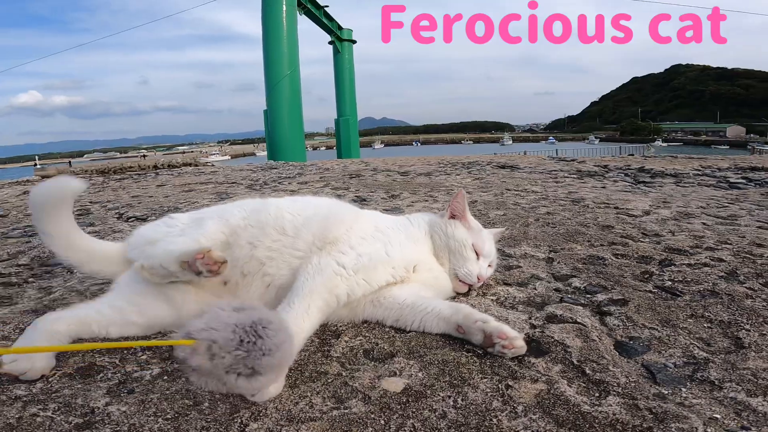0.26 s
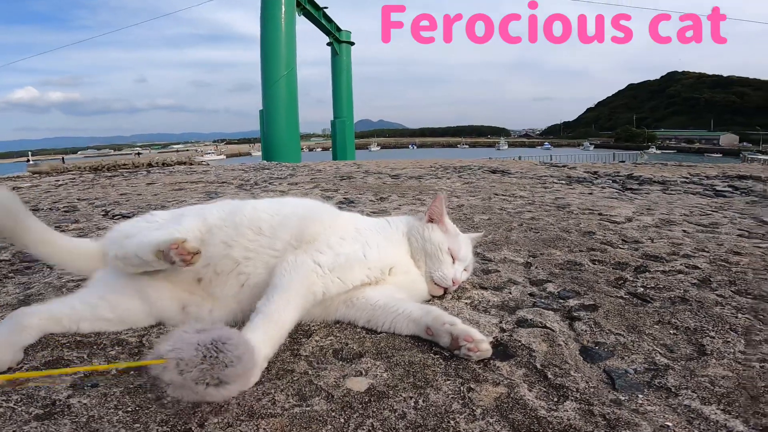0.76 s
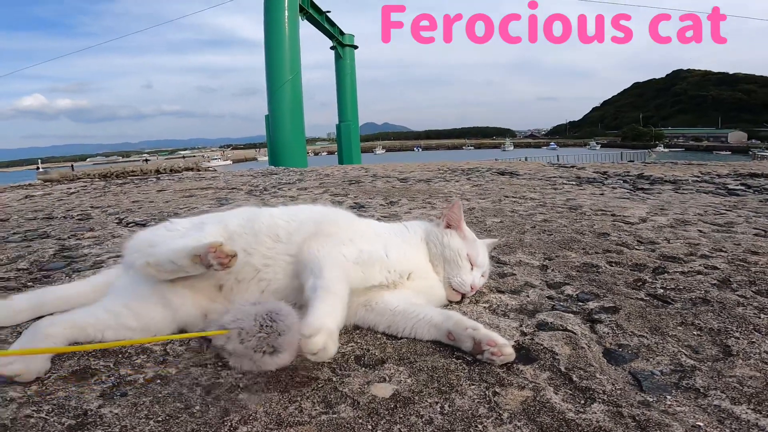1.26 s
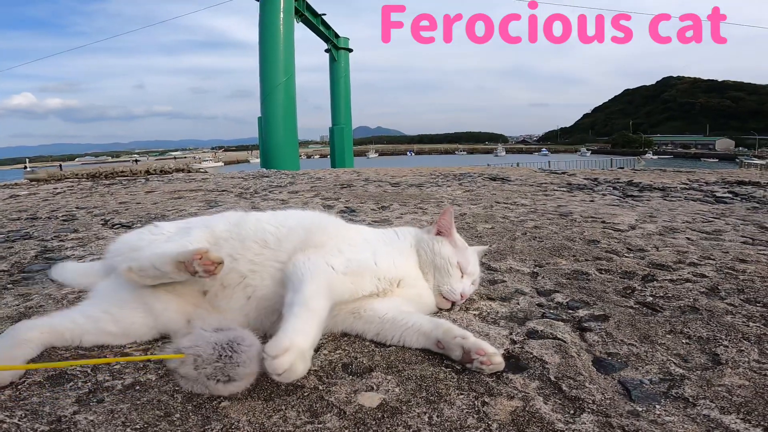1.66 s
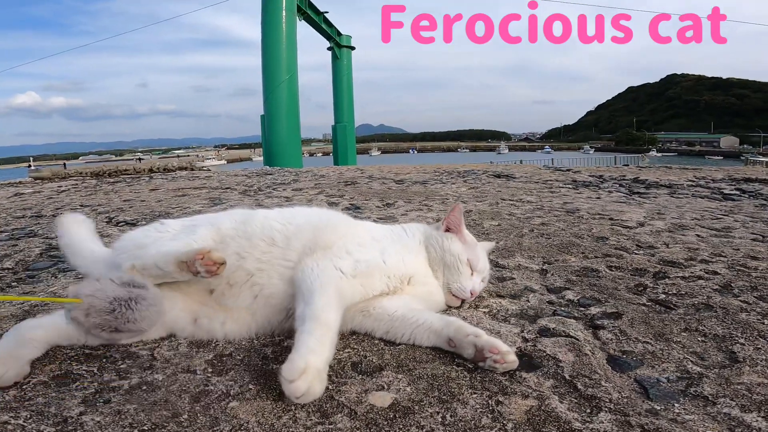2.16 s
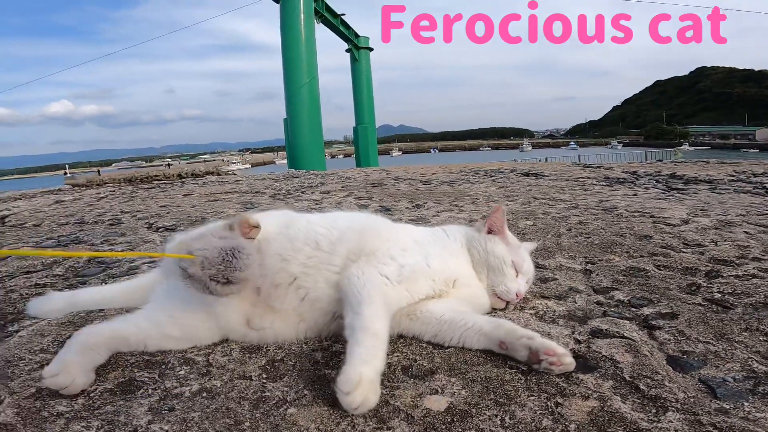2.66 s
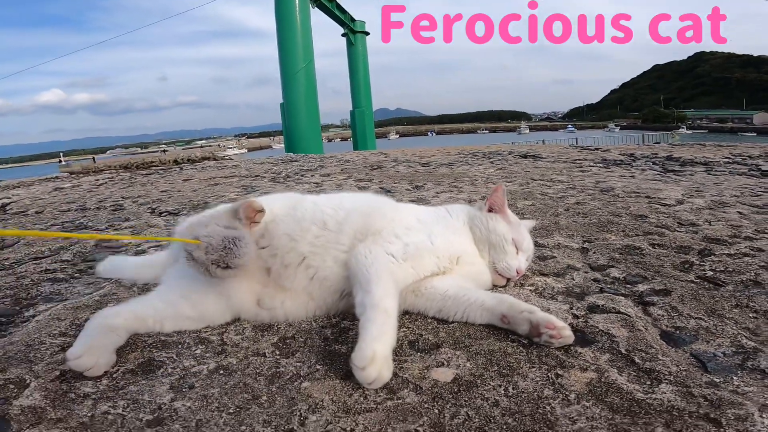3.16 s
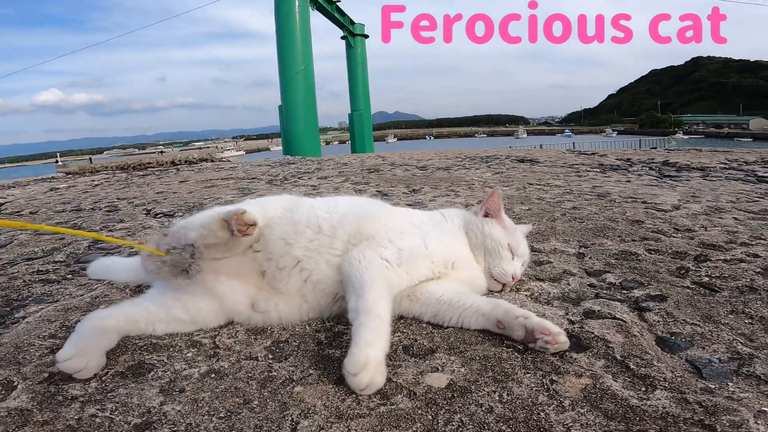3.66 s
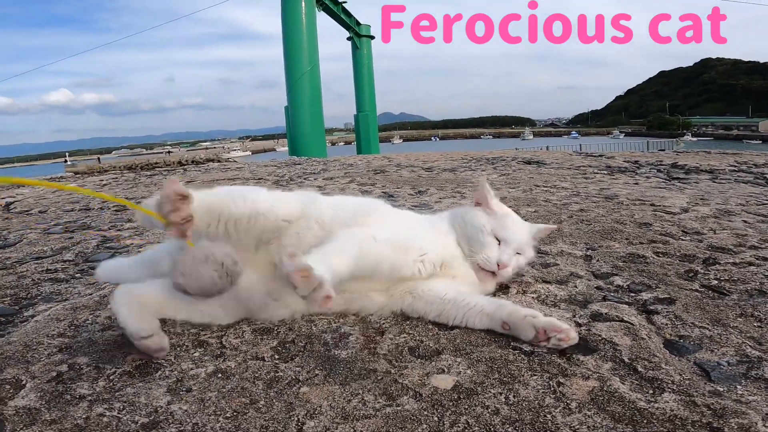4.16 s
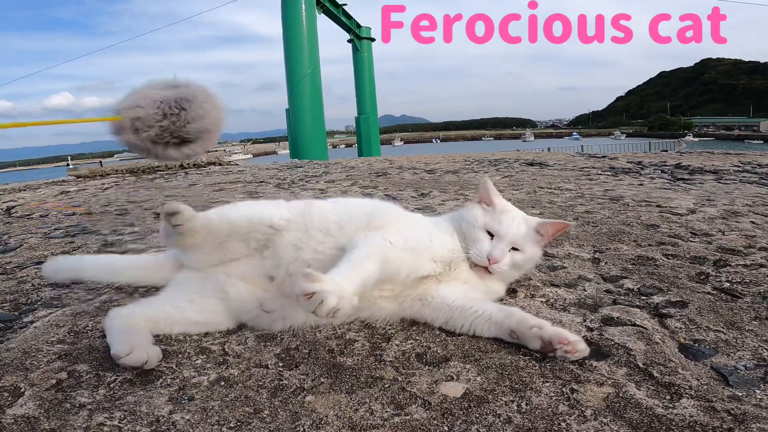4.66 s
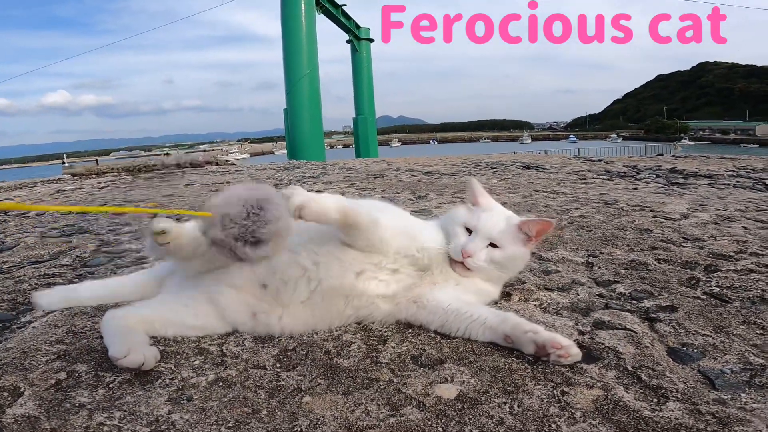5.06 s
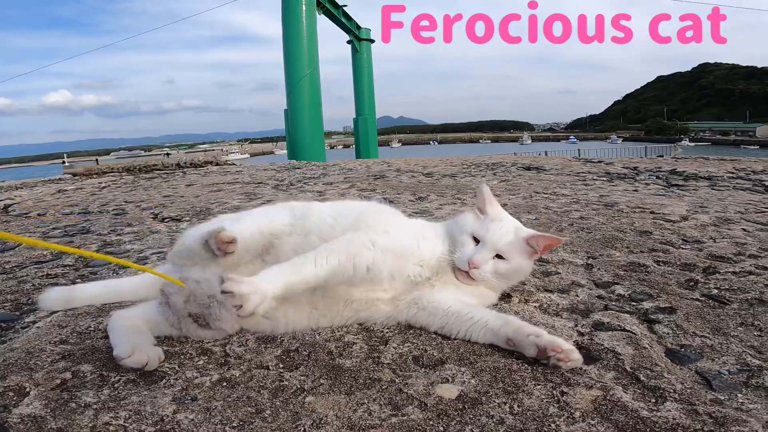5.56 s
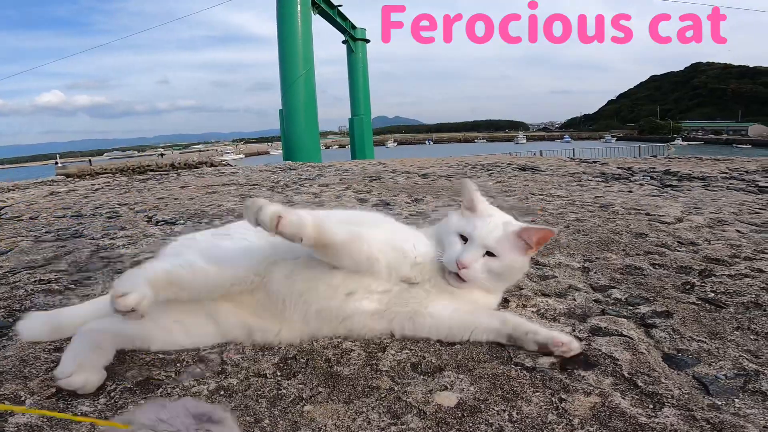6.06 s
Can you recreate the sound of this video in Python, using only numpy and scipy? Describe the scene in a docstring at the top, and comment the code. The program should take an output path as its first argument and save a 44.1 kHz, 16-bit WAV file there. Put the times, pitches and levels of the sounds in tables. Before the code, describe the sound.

An annoyed cat growls low with its mouth shut, moans thinly, then bursts into rough yowls and a sharp yelp in rumbling seaside wind.

```python
"""Stone quay: a cat teased with a fur toy on a stick growls with its mouth shut, slips into a thin moan,
then opens its mouth for rough yowls and a yelp. Growl: uneven pulses through chest and mouth resonances.
Moan: three harmonics. Yowls: pulses ringing mouth, lips and teeth, plus a sine fundamental.
The toy's brushing and the yelp's breathy hiss are shaped noise, with ticks, knocks and squeaks of the stick;
a far boat engine is a wavering sine; wind on the microphone and sea are banded noise."""
import sys
import numpy as np
from scipy import signal
from scipy.fft import rfft, irfft
from scipy.io import wavfile
from scipy.ndimage import uniform_filter1d

SR = 44100
rng = np.random.default_rng(int(sys.argv[2]) if len(sys.argv) > 2 else 0)


def transcribe(u):
    """Save the signal u as a 16-bit wav file named by the first command-line argument.

    u: samples, shape (n,) or (channels, n), limited to [-1, 1]; the rate is SR.
    q: integer samples, one column per channel.
    """
    v = np.clip(np.atleast_2d(u).T, -1, 1)
    q = np.round(v * 32767).astype(np.int16)
    wavfile.write(sys.argv[1], SR, q)


N = 279056
T = np.arange(N) / SR

# Effort of the long growl. Each row: time in seconds, chest level in dB before CHEST_TRIM_DB, mouth level in dB.
GROWL_EFFORT = [(.62, -51, -77), (.7, -43, -63), (.84, -41, -57), (.9, -42, -60), (1.1, -39.5, -59),
                (1.2, -44, -65.5), (1.42, -41, -59.5), (1.75, -44, -61), (2.33, -46.5, -67.5),
                (2.41, -39.5, -60), (2.5, -38, -55), (2.6, -43.5, -60.5), (2.9, -44, -64.5),
                (3.3, -45.5, -59.5), (3.62, -45, -61.5), (3.72, -42.5, -53), (3.93, -42.5, -52.5),
                (3.96, -44, -53.5)]
# Short creaks where a yowl starts or breaks off. Each row: start in seconds, length in seconds,
# chest level in dB before CHEST_TRIM_DB, mouth level in dB, mean flaps per second.
CREAKS = [(4.191, .055, -45, -51, 140), (5.153, 0.09, -44, -54.5, 200), (5.686, 0.055, -50, -45.5, 170)]
# Growl resonances. Each row: frequency in Hz, width in Hz, gain in dB before levelling.
CHEST_MODES = [(125, 88, 6.5), (304.3, 80, -2)]
MOUTH_MODES = [(963, 340, 23.5), (1270, 220, 5.1)]
# Faint nose hiss swelling within the growl: peak time in seconds, rise in seconds, fall in seconds.
NOSE_HISS = (1.6, .9, .6)
# Folds start slack, tighten to their usual pace and flap faster when pushed.
USUAL_FLAPS_PER_S, SLACK_SHARE, TIGHTEN_S = 126, .38, .25
USUAL_CHEST_DB, PACE_OCTAVES_PER_DB = -42.5, .09
UNEVENNESS, FLAP_SPREAD_DB, WEAK_FLAP_DB = .2, 3.5, -.5
CHEST_TRIM_DB, NOSE_RE_CHEST_DB, NOSE_MODE = 1, -42, (4450, 600, 0)
PUFF_DECAY_S, PUFF_SHARE, CREAK_FADE_S = .0064, .94, .0083
MOUTH_DROP_S, MOUTH_DROP_TAKES_S, MOUTH_DROP_RATIO, MOUTH_DROP_TOP_HZ = 3.58, .13, .83, 1145


def growl():
    """Slack vocal folds flap unevenly; each flap thumps the chest and puffs air into mouth and nose."""
    chest_db, mouth_db = in_time(GROWL_EFFORT)
    slack = SLACK_SHARE * swell(GROWL_EFFORT[0][0], TIGHTEN_S, TIGHTEN_S)
    push_octaves = PACE_OCTAVES_PER_DB * (chest_db - USUAL_CHEST_DB)
    pace = USUAL_FLAPS_PER_S * (1 - slack) * 2 ** push_octaves
    chest_gain, mouth_gain = during(GROWL_EFFORT) * from_db([chest_db, mouth_db])
    for s, length_s, creak_chest_db, creak_mouth_db, flaps_per_s in CREAKS:
        creak = during([[s], [s + length_s]], fade_s=CREAK_FADE_S)
        pace = np.where(creak > 0, flaps_per_s, pace)
        chest_gain = chest_gain + creak * from_db(creak_chest_db)
        mouth_gain = mouth_gain + creak * from_db(creak_mouth_db)

    flap_number = np.floor(np.cumsum(pace * np.exp(UNEVENNESS * drift(75))) / SR)
    flaps = np.diff(flap_number, prepend=0) * from_db(FLAP_SPREAD_DB * drift(130))
    air_flaps = flaps * from_db(WEAK_FLAP_DB * (flap_number % 2))  # every second flap passes less air

    chest = cut(resonate(flaps, CHEST_MODES), 435, "low", order=6)
    chest = evened(cut(chest, 92, "high"), size=1500)

    puff_envelope = signal.lfilter([1], [1, -np.exp(-1 / (PUFF_DECAY_S * SR))], air_flaps + 1e-18)
    puffs = puff_envelope * rng.standard_normal(N)
    flow = rms_one(air_flaps) + PUFF_SHARE * rms_one(puffs)

    # mouth rings lower just before the first cry
    dropped = np.clip((T - MOUTH_DROP_S) / MOUTH_DROP_TAKES_S, 0, 1)
    lower_modes = [(hz * MOUTH_DROP_RATIO, width, db) for hz, width, db in MOUTH_MODES]
    lower_mouth = cut(resonate(flow, lower_modes), MOUTH_DROP_TOP_HZ, "low", order=8)
    mouth = (1 - dropped) * resonate(flow, MOUTH_MODES) + dropped * lower_mouth
    mouth = cut(mouth, 1480, "low", order=8)
    mouth = evened(cut(mouth, 480, "high"), size=1300)

    nose = rms_one(resonate(resonate(puffs, [NOSE_MODE]), [NOSE_MODE]))
    nose_gain = from_db(NOSE_RE_CHEST_DB) * swell(*NOSE_HISS)
    return chest_gain * (from_db(CHEST_TRIM_DB) * chest + nose_gain * nose) + mouth_gain * mouth


# Closed-mouth moan. Each row: time in seconds, mean pitch in Hz, mean level in dB.
MOAN_CURVE = [(3.0, 379.7, -53), (3.038, 378.6, -38), (3.106, 372, -43.5), (3.214, 380.5, -33),
              (3.388, 381.5, -32.5), (3.43, 387.3, -30), (3.502, 396, -34.5), (3.524, 394, -41.5),
              (3.534, 391.6, -52), (3.544, 396, -42), (3.568, 394.9, -42), (3.578, 394.8, -47.5)]


def moan(second_db=-35, third_db=-36, pitch_spread=.005, level_spread_db=1):
    """With the mouth shut the folds lock into an almost pure tone, shaken a little."""
    pitch_hz, level_db = in_time(MOAN_CURVE)
    phase = 2 * np.pi * np.cumsum(pitch_hz * (1 + pitch_spread * drift(70))) / SR
    tone = np.cos(phase) + from_db(second_db) * np.cos(2 * phase) + from_db(third_db) * np.cos(3 * phase)
    return np.sqrt(2) * during(MOAN_CURVE) * from_db(level_db + level_spread_db * drift(60)) * tone


# Four open-mouthed cries, a curve each. Each row: time in seconds, pitch in Hz and level in dB before the throb,
# mouth resonance set by the jaw in Hz, lip snarl in dB relative to the level.
YOWL_CURVES = [
    [(3.945, 342.3, -54, 555, -37), (3.985, 337.6, -49.5, 580, -35), (4.025, 335.6, -54, 640, -24),
     (4.072, 318.4, -45.5, 890, -9), (4.078, 300.8, -39, 890, -18.5), (4.118, 281.6, -32.5, 950, -18),
     (4.14, 316, -26.5, 1030, -17), (4.158, 313, -26.5, 1060, -19), (4.172, 357.3, -26, 1080, -16),
     (4.192, 314.4, -30, 1130, -17), (4.2, 168.3, -32.5, 1170, -17), (4.218, 110, -37, 1160, -26),
     (4.243, 62, -52, 1030, -20)],
    [(5.157, 240.2, -50, 1140, -30), (5.19, 189.6, -48, 1100, -40), (5.228, 100, -62, 950, -26),
     (5.258, 264.8, -34, 850, -35), (5.28, 276.7, -38.5, 850, -38), (5.315, 282.3, -39.5, 870, -38),
     (5.39, 278.3, -34.5, 810, -46), (5.45, 296.8, -32, 840, -51), (5.478, 320.3, -31.5, 910, -42),
     (5.492, 308.3, -31.5, 910, -45), (5.512, 318.7, -29.5, 930, -40), (5.615, 325.4, -32.5, 954, -42.5),
     (5.662, 334.2, -28.5, 1020, -54), (5.672, 311.5, -27, 1020, -52), (5.686, 305, -28.5, 1030, -50),
     (5.704, 312, -38, 1080, -43), (5.722, 340, -38, 1120, -33)],
    [(5.72, 354, -39.5, 1090, -29), (5.745, 434.3, -46.5, 1110, -15), (5.765, 367.5, -38, 1050, -38),
     (5.786, 323, -20, 1230, -30.5), (5.803, 311, -19.5, 1300, -38), (5.822, 300.6, -30, 1250, -30.5),
     (5.843, 198, -39, 1190, -16)],
    [(5.905, 350, -46, 1200, -21), (5.922, 311.4, -32.5, 1290, -24), (5.95, 247.5, -32, 1270, -23),
     (5.966, 253.4, -34, 1210, -20), (5.978, 301.4, -37, 1190, -20), (6.0, 306, -32.5, 1180, -21),
     (6.01, 258.8, -34.5, 1110, -28), (6.052, 274.8, -33.5, 1010, -38), (6.073, 282, -29.5, 1100, -42),
     (6.091, 265.7, -35, 940, -42), (6.108, 256.7, -37, 900, -38), (6.128, 258, -38.5, 900, -30),
     (6.139, 282, -39, 880, -13), (6.165, 264, -33.5, 860, -15), (6.21, 269.5, -40.5, 880, -26),
     (6.235, 293, -46.5, 880, -27), (6.258, 271, -45.5, 860, -34), (6.29, 327, -60, 860, -22),
     (6.308, 348, -83, 859, -14)],
]
# One row per cry: fundamental in dB at the usual level and pitch, throat resonance ratio,
# lip resonance as a multiple of the mouth's, teeth resonance at the start in Hz, at the end in Hz,
# teeth level in dB relative to the fundamental at the usual level, time the teeth take to show in seconds.
MOUTH_SHAPES = [(-41, 1.01, 1.9, 5900, 5050, -27, 0.13), (-38.5, 0.999, 2.05, 6130, 6300, -25, .02),
                (-36.5, 0.995, 1.95, 6800, 4450, -22.5, .01), (-38, 0.987, 1.98, 4930, 4600, -23.5, .01)]
# Throat and open mouth. Each row: frequency in Hz before the throat ratio, gain in dB.
THROAT_COLOUR = [(300, -0.5), (480, 6), (620, -1.5), (720, 0.5), (850, 9), (1000, 3.5), (1280, 4),
                 (1580, -2.5), (1850, -8), (2100, -25), (2400, -48.5), (5000, -73.5)]
# Drawn-back lips. Each row: frequency in Hz for a lip resonance at SNARL_REF_HZ, gain in dB.
SNARL_COLOUR = [(900, -50), (1400, -25), (1750, -1.5), (2000, 8.5), (2350, -5.5), (2620, -16),
                (2950, -35.5), (5000, -75.5)]
SNARL_REF_HZ, JAW_WIDTH_HZ, TEETH_WIDTH_HZ = 2054, 330, 480
# Teeth resonances: ratio to the gap frequency, gain in dB.
TEETH_MODES = ((1, 0), (1.83, -12))
# The fundamental grows more slowly than the cry and carries better at high pitch.
FUNDAMENTAL_FOLLOWS, FUNDAMENTAL_DB_PER_OCTAVE = .17, 14
USUAL_YOWL_DB, USUAL_YOWL_HZ, CRY_FADE_S = -29, 303, .0081
# Teeth hiss grows with the cry and differs from puff to puff.
TEETH_FOLLOWS, TEETH_SPUTTER_DB = .12, 4
# Flutter bunches the snaps and weakens them where they lie furthest apart; a little chance comes on top.
FLUTTER_HZ, FLUTTER_WANDER, FLUTTER_SHIFT_S, FLUTTER_DB = 64, .3, .00023, 1.8
JITTER_SHARE, SHIMMER_DB, THROB_OCTAVES_PER_DB = .028, .9, .033
MOUTH_AIR, LIP_AIR, TEETH_AIR = .35, 1, 4.3
RING_HZ = np.fft.rfftfreq(1024, 1 / SR) + 1


def yowl(curve, fundamental_db, throat_ratio, lip_ratio, teeth_start_hz, teeth_end_hz, teeth_db, teeth_rise_s):
    """The folds snap shut once a cycle and ring mouth, lips and teeth; rough passages flutter."""
    pitch_hz, level_db, jaw_hz, snarl_db = in_time(curve)
    throb_db = throb()
    pitch_hz = pitch_hz * 2 ** (-THROB_OCTAVES_PER_DB * throb_db)  # swelling also lowers the pitch
    level_db = level_db + throb_db
    base_db = fundamental_db + FUNDAMENTAL_FOLLOWS * (level_db - USUAL_YOWL_DB)
    base_db = base_db + FUNDAMENTAL_DB_PER_OCTAVE * np.log2(pitch_hz / USUAL_YOWL_HZ)
    sounding = during(curve, fade_s=CRY_FADE_S)

    # one snap per cycle; read every curve at the snaps
    on = sounding > 0
    cycles = np.cumsum(pitch_hz[on]) / SR
    s = np.interp(np.arange(int(cycles[-1]) + 1), cycles, T[on])
    curves = (pitch_hz, level_db, jaw_hz, snarl_db, base_db, roughness(), sounding)
    hz, db, jaw, snarl, base, rasp, gate = [np.interp(s, T, c) for c in curves]
    timing, force, wander, spit = np.clip(rng.standard_normal((4, 300))[:, :len(s)], -1.8, 1.8)
    flutter = 2 * np.pi * np.cumsum(FLUTTER_HZ / hz * (1 + FLUTTER_WANDER * wander))
    shift_s = rasp * (FLUTTER_SHIFT_S * np.sin(flutter) + JITTER_SHARE * timing / hz)
    s = np.sort(s + shift_s)
    snap_db = rasp * (SHIMMER_DB * force - FLUTTER_DB * np.cos(flutter))
    strength = gate * np.sqrt(SR / hz) * from_db(snap_db)

    # a wider jaw carries mouth and lip resonances upwards
    jaw = jaw[:, None]
    throat = from_db(at_hz(THROAT_COLOUR, RING_HZ / throat_ratio))
    mouth = throat / np.hypot(1, (RING_HZ - jaw) / JAW_WIDTH_HZ)
    lips = from_db(at_hz(SNARL_COLOUR, RING_HZ * SNARL_REF_HZ / (lip_ratio * jaw)))
    # the narrow ring of the gap between the teeth slides through the cry
    gap_hz = np.interp(s, [s[0], s[-1]], [teeth_start_hz, teeth_end_hz])[:, None]
    teeth = sum(from_db(mode_db) / (1 + ((RING_HZ / ratio - gap_hz) / TEETH_WIDTH_HZ) ** 2) ** 2
                for ratio, mode_db in TEETH_MODES)
    hiss_db = base + teeth_db + TEETH_FOLLOWS * (db - USUAL_YOWL_DB)
    hiss_db = hiss_db + TEETH_SPUTTER_DB * np.sqrt(rasp) * spit
    teeth_shown = np.clip((s - curve[0][0]) / teeth_rise_s, 0, 1)

    phase = 2 * np.pi * np.interp(T, s, np.arange(len(s)))
    fundamental = np.sqrt(2) * sounding * from_db(base_db) * np.sin(phase)
    mouth_ring = rung(s, strength * from_db(db), mouth, MOUTH_AIR * rasp)
    lip_ring = rung(s, strength * from_db(db + snarl), lips, LIP_AIR * np.sqrt(rasp))
    teeth_ring = rung(s, strength * from_db(hiss_db) * teeth_shown, teeth, TEETH_AIR * np.sqrt(rasp))
    return fundamental + mouth_ring + lip_ring + teeth_ring


# Throb as the long yowl gathers force. Each row: time in seconds, depth in dB.
THROB_DEPTH = [(5.24, 0), (5.27, 4), (5.305, 5.5), (5.35, 2.7), (5.46, 2.7), (5.48, 2.2), (5.495, 0)]


def throb(rate_hz=17.7, crest_s=5.282):
    """Swell and sink of the voice in dB."""
    depth_db, = in_time(THROB_DEPTH)
    return depth_db * np.cos(2 * np.pi * rate_hz * (T - crest_s))


# Cries are rough except where the folds lock into a note.
# Each row: start in seconds, end in seconds, roughness left from 0 to 1.
CLEAR_NOTES = [(3.93, 4.06, .35), (4.095, 4.16, .55), (4.168, 4.19, .35), (5.39, 5.48, .4),
               (5.495, 5.662, .08), (5.785, 5.812, .3), (6.02, 6.14, .6), (6.062, 6.08, .2),
               (6.155, 6.31, .22)]


def roughness(lock_s=.06, break_s=.025):
    """The folds settle gradually into each clear note and break out of it quickly."""
    notes = []
    for start_s, end_s, left in CLEAR_NOTES:
        outside = np.clip(np.maximum((start_s - T) / lock_s, (T - end_s) / break_s), 0, 1)
        notes.append(left + (1 - left) * np.sqrt(outside))
    return np.min(notes, axis=0)


def rung(s, strength, gains, air):
    """Puffs at times s: a click and a short rush of air ring through one resonance curve (row) each."""
    size = 2 * (len(RING_HZ) - 1)
    lags = np.arange(size)
    # folded cepstrum: minimum-phase response, so each ring starts at its puff
    causal = irfft(np.log(gains + 1e-6)) * (1 + np.sign(size / 2 - lags) * (lags > 0))
    rush = rng.standard_normal((300, size))[:len(s)]
    rush = rush * np.exp(-lags / (.002 * SR)) / np.sqrt(.001 * SR)
    start, late = np.divmod(s * SR, 1)
    sub_sample_delay = np.exp(-2j * np.pi * RING_HZ * late[:, None] / SR)
    puffs = (1 + air[:, None] * rfft(rush)) * sub_sample_delay
    rings = -irfft(np.exp(rfft(causal)) * puffs)
    rings *= (strength / np.sqrt(np.sum(rings ** 2, axis=1)))[:, None]  # energy set by strength
    return np.bincount((start.astype(int)[:, None] + lags).ravel(), rings.ravel(), N)[:N]


# Brushing strokes of the toy; the swell at 5.81 is breathy hiss of the yelp. Each row: peak time in seconds,
# body level in dB before BODY_TRIM_DB, rise in seconds, fall in seconds,
# fine hiss in dB relative to the body before both trims.
STROKES_AND_HISS = [(.04, -69.5, 0.23, 0.16, -10.5), (.9, -83.5, 0.53, 0.58, -9),
                    (1.62, -78, 0.13, 0.23, -13), (2.05, -74.5, 0.39, 0.16, -12),
                    (2.42, -81, 0.21, .12, -13), (3.349, -76, 0.19, 0.26, -10.5),
                    (3.399, -67, 0.041, 0.038, -20), (4.22, -70.5, 0.064, 0.4, -9.5),
                    (4.44, -53, 0.08, 0.047, -15), (4.59, -63.5, 0.05, 0.15, -12),
                    (4.81, -69, 0.076, 0.19, -12), (5.31, -77, 0.022, 0.08, -7),
                    (5.742, -58.5, 0.033, 0.019, -16), (5.81, -58, 0.075, 0.033, -20),
                    (5.97, -61.5, 0.094, 0.25, -17), (6.24, -61.5, 0.073, 0.073, -12)]
# Brush spectra. Each row: frequency in Hz, relative level in dB.
BRUSH_COLOUR = [(700, -5.5), (1500, 5), (2300, 4.5), (3200, 2.5), (5000, 2), (7000, 0), (8500, -11.5),
                (10000, -27.5)]
BRUSH_TOP_COLOUR = [(6000, -17.5), (8000, -12), (10000, -4.5), (12200, -13.5), (13500, -13), (15000, -18)]
# Faint steady rubbing, levels before the trims.
RUB_DB, RUB_FINE_DB, RUB_END_S, RUB_FADE_S = -79, -94.5, 5.42, .19
BODY_TRIM_DB, TOP_TRIM_DB, GRAIN_SPREAD_DB = 6, 4, 1.5


def brushing():
    """Hairs catch and slip in a fine grain above faint rubbing; the yelp's hiss swells in the same noise."""
    rubbing = np.where(T < RUB_END_S, 1, swell(RUB_END_S, RUB_FADE_S, RUB_FADE_S))
    level, fine = rubbing * from_db(RUB_DB), rubbing * from_db(RUB_FINE_DB)
    for s, db, rise_s, fall_s, fine_db in STROKES_AND_HISS:
        swelling = from_db(db) * swell(s, rise_s, fall_s)
        level = np.hypot(level, swelling)
        fine = np.hypot(fine, from_db(fine_db) * swelling)
    body = level * from_db(BODY_TRIM_DB) * banded_noise(BRUSH_COLOUR, patchy_db=1)
    top = fine * from_db(TOP_TRIM_DB) * banded_noise(BRUSH_TOP_COLOUR, patchy_db=.5)
    grain = from_db(GRAIN_SPREAD_DB * drift(150))
    return grain * (panned(body, left_db=3.5) + panned(top, left_db=9))


# Knocks and ticks of the stick. Each row: time in seconds, tick level in dB before tick_trim_db,
# knock drive in dB relative to that.
TICKS = [(0.426, -51, 24), (0.8944, -53, -3), (2.5261, -57, 31), (3.4523, -44.5, -13), (4.572, -44, -15),
         (5.0971, -45.5, 16.5), (5.724, -44, -3), (5.74, -42, -3), (6.1757, -60, 10)]
# The stick jolts the microphone. Each row: time in seconds, level in dB before bump_trim_db, frequency in Hz.
BUMPS = [(0.419, -22, 27.3), (5.093, -32.5, 88)]


def stick(tick_trim_db=-12, tick_decay_s=.0081, knock_mode=(900, 1000, 15), bump_trim_db=-2, bump_decay_s=.035):
    """Each touch is a short crackle over a dull knock; a jolt shakes the microphone in a decaying sine."""
    crackle = cut(rng.standard_normal((2, N)), [1800, 12500], "band")
    crackle = rms_one(cut(crackle, 6000, "low", order=1))
    out, touches = np.zeros((2, N)), np.zeros(N)
    for s, db, knock_db in TICKS:
        fading = (T >= s) * np.exp(-np.minimum(np.abs(T - s) / tick_decay_s, 20))
        out += fading * from_db(db + tick_trim_db) * crackle
        touches[round(s * SR)] = from_db(db + knock_db)
    for s, db, hz in BUMPS:
        age_s = np.maximum(T - s, 0)
        out -= from_db(db + bump_trim_db) * np.sin(2 * np.pi * hz * age_s) * np.exp(-age_s / bump_decay_s)
    return out + cut(resonate(touches, [knock_mode]), 1500, "low")


# The toy's wand squeaks and rings briefly. Each row: start in seconds, peak level in dB, frequency in Hz.
SQUEAKS = [(3.399, -54, 3200), (3.457, -44, 1840), (3.475, -45, 1781), (4.256, -46, 1586),
           (6.177, -48, 4293)]


def squeaks(rise_s=.0007):
    """Each one is a tone that swells and dies within a few milliseconds."""
    out = 0
    for s, db, hz in SQUEAKS:
        age = np.clip((T - s) / rise_s, 0, 20)
        out = out + from_db(db) * age * np.exp(1 - age) * np.sin(2 * np.pi * hz * T)
    return out


# Far engine, swelling and fading on the wind. Each row: time in seconds, level in dB.
ENGINE_LEVEL = [(0.0, -40), (0.07, -38), (0.65, -34), (0.77, -45.5), (0.81, -37.5), (0.97, -50), (1.0, -50),
                (1.21, -46), (1.36, -35.5), (2.29, -35), (2.86, -39), (3.49, -58), (3.7, -36.5),
                (4.0, -32.5), (4.58, -37.5), (4.74, -44.5), (4.81, -61), (4.88, -48.5), (5.27, -37.5),
                (5.66, -36), (6.12, -38.5), (6.33, -55)]


def engine(mean_hz=80.43, waver=.0061):
    """Only the firing note carries over the water: a slowly wavering sine."""
    level_db, = in_time(ENGINE_LEVEL)
    phase = 2 * np.pi * np.cumsum(mean_hz * (1 + waver * drift(2.7))) / SR
    return np.sqrt(2) * from_db(level_db) * np.sin(phase)


# Gusts on the microphone. Each row: peak time in seconds, level in dB before WIND_TRIM_DB.
GUSTS = [(.43, -43), (1.37, -35.5), (1.67, -38), (1.85, -39), (2.11, -39.5), (4.0, -48), (4.27, -42),
         (5.07, -51), (5.75, -39), (6.0, -44)]
# Wind, then sea and open air. Each row: frequency in Hz, relative level in dB.
WIND_COLOUR = [(15, -5), (27, -6), (45, -5), (80, -9.5), (130, -20.5), (200, -21.5), (300, -34), (500, -45)]
SEA_COLOUR = [(130, 8.5), (220, 1.5), (350, -1.5), (600, -11), (1200, -11), (1600, -16), (2000, -17.5),
              (3000, -32), (5000, -55.5)]
GUST_RISE_S, GUST_FALL_S = .082, .11
BREEZE_DB, BREEZE_SPREAD_DB, WIND_TRIM_DB, SEA_DB = -48.5, 4, -1.5, -52  # breeze before the trim


def outdoors():
    """Gusts and a steady breeze rumble on the microphone above an even wash of sea."""
    gusts = sum(from_db(db) * swell(s, GUST_RISE_S, GUST_FALL_S) for s, db in GUSTS)
    breeze = from_db(BREEZE_DB + BREEZE_SPREAD_DB * drift(4.7))
    wind_gain = from_db(WIND_TRIM_DB) * np.hypot(gusts, breeze)
    wind = wind_gain * banded_noise(WIND_COLOUR, patchy_db=0)
    return wind + from_db(SEA_DB) * banded_noise(SEA_COLOUR, patchy_db=2.5)


# Stereo likeness of the noises. Each row: frequency in Hz, left-right correlation.
LIKENESS = [(25, 0.91), (60, 0.99), (250, 0.89), (1000, 0.56), (2000, 0.099), (4000, 0.48), (8000, 0.22),
            (14000, 0.22)]


def banded_noise(spectrum, patchy_db):
    """Half-octave bands of stereo noise, each with its own flicker and likeness; rms 1."""
    low_hz, high_hz = spectrum[0][0], spectrum[-1][0]
    edges_hz = 14 * 2 ** np.arange(0, 10.6, .5)
    out, white = 0, rng.standard_normal((2, 2, N))
    for k, band in enumerate(zip(edges_hz, edges_hz[1:])):
        hz = np.sqrt(band[0] * band[1])
        if low_hz <= hz <= high_hz:
            mid, side = cut(white[k % 2], band, "band", order=3)  # neighbours use separate noise
            alike = np.clip(at_hz(LIKENESS, hz), -1, 1)
            gain = from_db(at_hz(spectrum, hz) + patchy_db * drift(11.5))
            out = out + gain * (np.sqrt(1 + alike) * mid + np.sqrt(1 - alike) * side * [[1], [-1]])
    return rms_one(out)


def from_db(db):
    """Decibels to gain."""
    return 10 ** (np.asarray(db) / 20)


def rms_one(x):
    """Scale to unit rms."""
    return x / np.sqrt(np.mean(x ** 2) + 1e-20)


def in_time(rows):
    """Each column of a curve at every sample."""
    s, *columns = np.transpose(rows)
    return [np.interp(T, s, c) for c in columns]


def at_hz(points, hz):
    """Read a spectrum on a log-frequency axis."""
    points = np.array(points)
    return np.interp(np.log(hz), np.log(points[:, 0]), points[:, 1])


def during(rows, fade_s=.0017):
    """One while a curve lasts, with soft ends."""
    return np.clip(np.minimum(T - rows[0][0], rows[-1][0] - T) / fade_s, 0, 1)


def swell(s, rise_s, fall_s):
    """A rounded rise to one at time s, and a fall."""
    return np.exp(-np.minimum(((T - s) / np.where(T < s, rise_s, fall_s)) ** 2, 20))


def drift(rate):
    """Smooth chance of spread 1 that changes about rate times a second."""
    r = np.exp(-40 * np.pi * rate / SR)  # computed at every 20th sample
    slow = signal.lfilter([1], [1, -2 * r, r * r], rng.standard_normal(N // 20 + 4002))[4000:]
    return np.interp(np.arange(N) / 20, np.arange(len(slow)), rms_one(slow))


def cut(x, hz, kind, order=2):
    """Butterworth filter."""
    sos = signal.butter(order, np.clip(hz, 10, .45 * SR), kind, fs=SR, output="sos")
    return signal.sosfilt(sos, x)


def resonate(x, modes):
    """Parallel two-pole resonances of (Hz, width in Hz, dB)."""
    out = 0
    for hz, width_hz, db in modes:
        r = np.exp(-np.pi * width_hz / SR)
        zeros = np.array([1, 0, -1]) * (1 - r * r) / 2
        poles = [1, -2 * r * np.cos(2 * np.pi * hz / SR), r * r]
        out = out + from_db(db) * signal.lfilter(zeros, poles, x + 1e-18)
    return out


def evened(x, size):
    """Hold the short-term rms (window in samples) near one."""
    return x / np.sqrt(np.abs(uniform_filter1d(x * x, size)) + 1e-4 * np.mean(x * x))


def panned(x, left_db, lag_s=0):
    """Place a sound between the two ears; the left one hears it lag_s later."""
    left, right = np.broadcast_to(x, (2, N))
    return np.array([np.interp(T - lag_s, T, left), right]) * from_db(np.array([[left_db], [-left_db]]) / 2)


def scene():
    """The cat lies a little to the right of the middle, the brushing comes from the left."""
    lag_s = 4.5e-5
    cries = sum(yowl(curve, *shape) for curve, shape in zip(YOWL_CURVES, MOUTH_SHAPES))
    cat = panned(growl() + moan(), left_db=-.5, lag_s=lag_s) + panned(cries, left_db=-2, lag_s=lag_s)
    return cat + brushing() + stick() + squeaks() + engine() + outdoors()


def record(dry):
    """A steep low-pass removes the top, 70 dB down from 15.3 kHz."""
    return signal.sosfilt(signal.cheby2(12, 70, 15300, fs=SR, output="sos"), dry)


dry = scene()
out = record(dry)
transcribe(out)
```